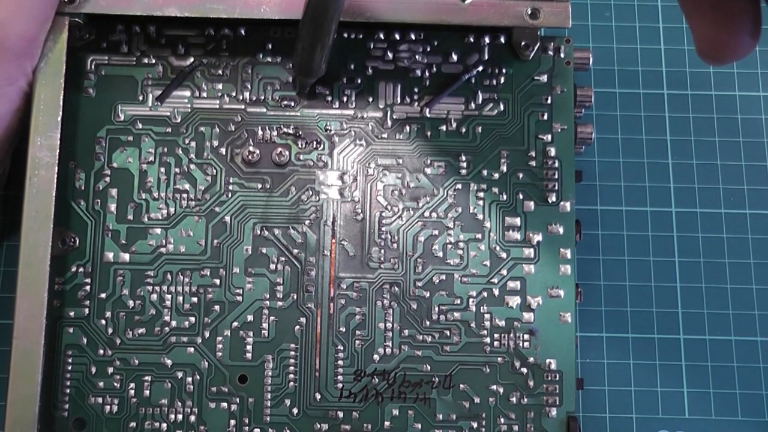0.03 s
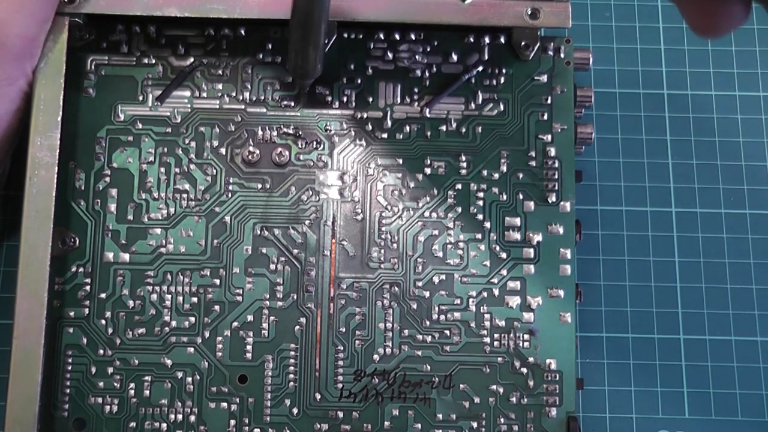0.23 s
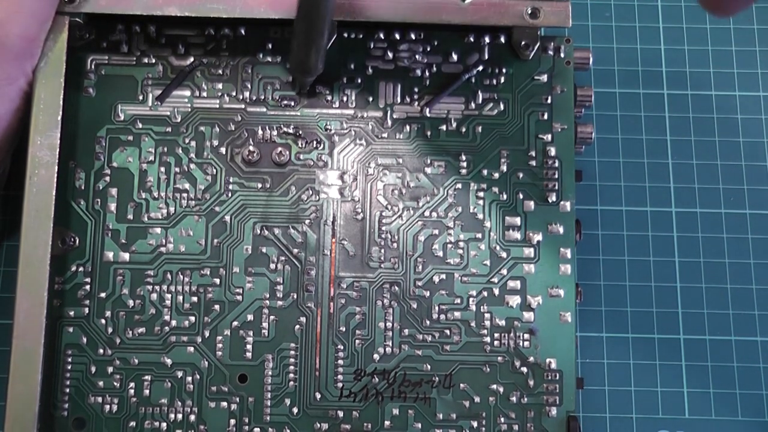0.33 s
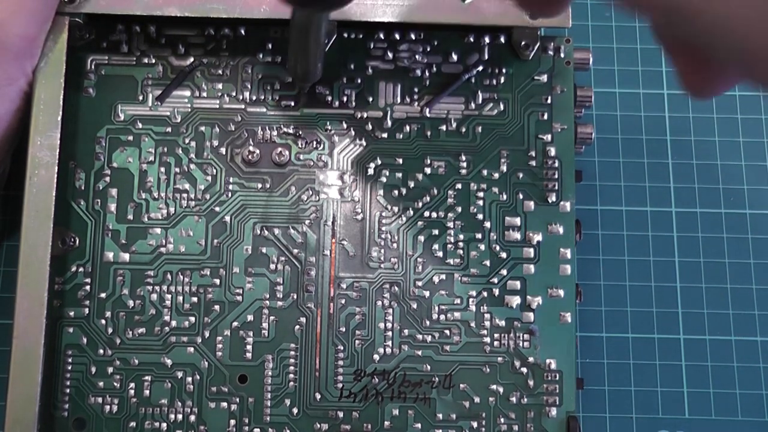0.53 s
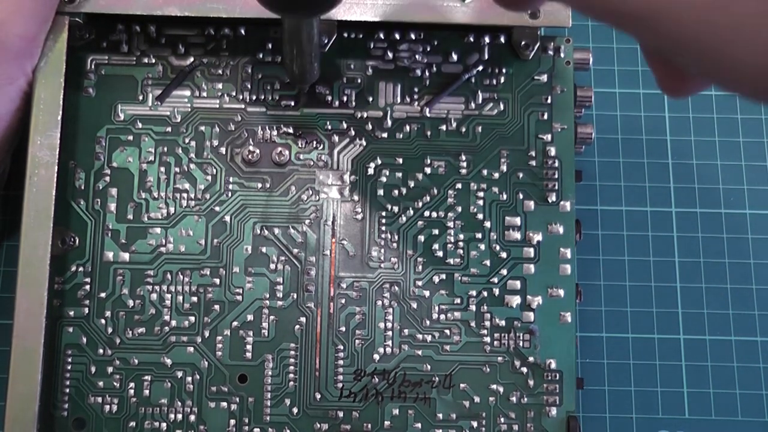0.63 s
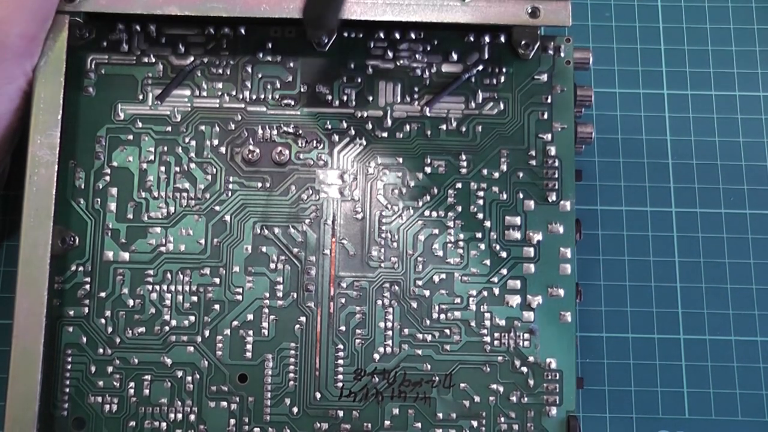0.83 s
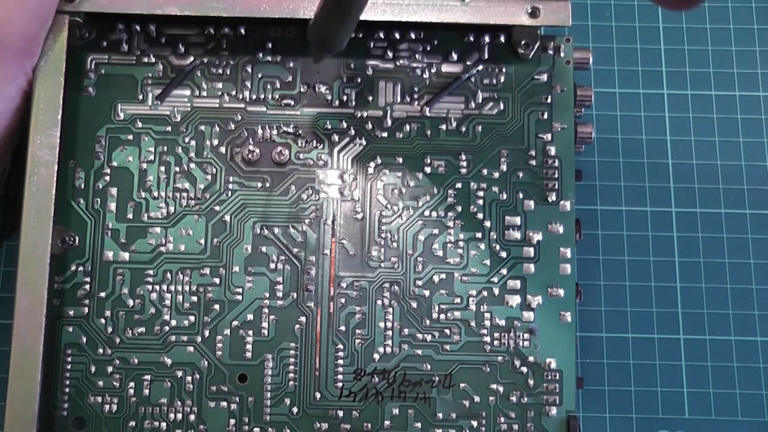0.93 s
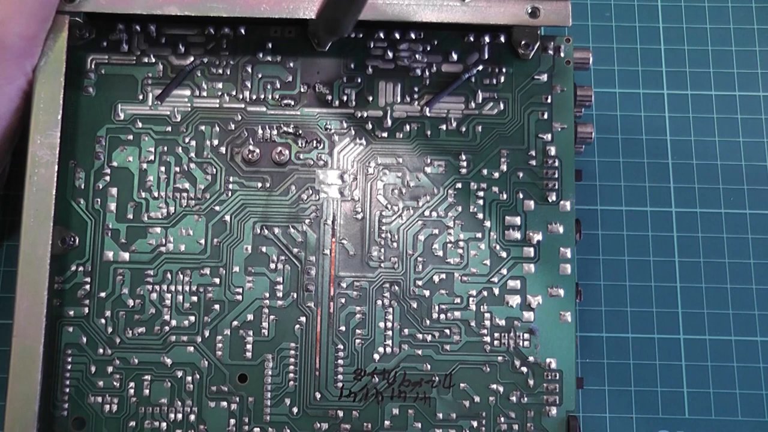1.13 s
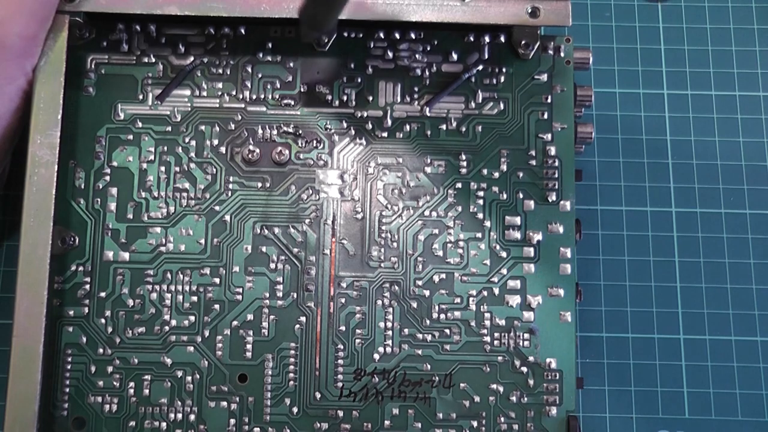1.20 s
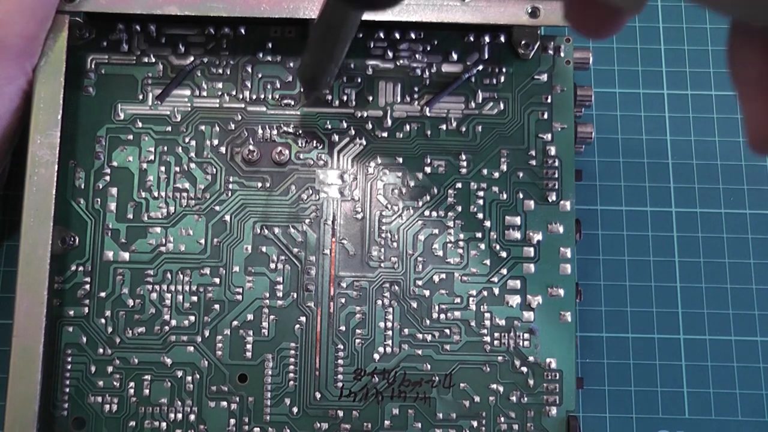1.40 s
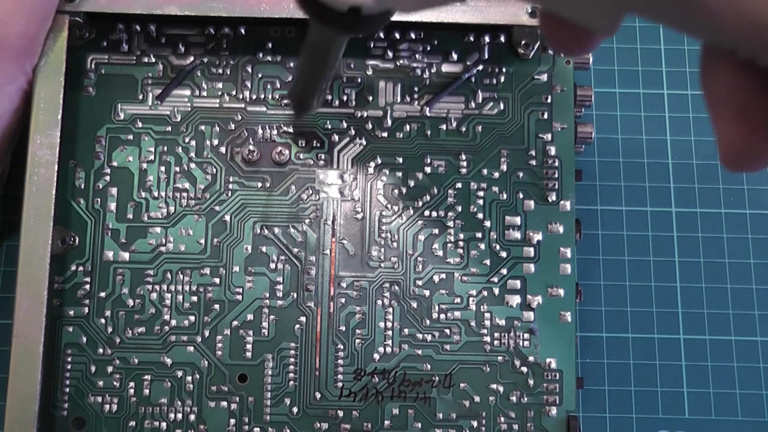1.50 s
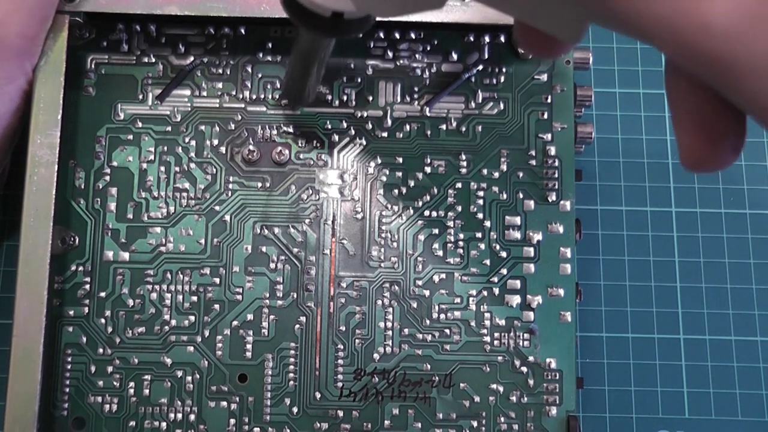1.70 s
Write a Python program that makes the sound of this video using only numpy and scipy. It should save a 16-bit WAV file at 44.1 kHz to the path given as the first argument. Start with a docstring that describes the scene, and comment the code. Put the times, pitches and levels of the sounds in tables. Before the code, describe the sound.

Desoldering gun buzzing and hissing in one longer and two short bursts, its trigger clicking.

```python
"""Desoldering gun on a circuit board

A desoldering gun is triggered three times at a workbench. Its switch clicks, and its diaphragm pump
spins up, buzzes, rattles, sucks air and coasts to rest. In the first burst the nozzle seals on a joint,
so the pump runs faster and cleaner. Solder spits, and the nozzle scrapes and knocks on the board.
A faint hum fills the room."""
import sys
import numpy as np
from scipy import signal
from scipy.fft import rfft, irfft
from scipy.io import wavfile

SR = 44100
rng = np.random.default_rng(int(sys.argv[2]) if len(sys.argv) > 2 else 0)


def store_pcm(level_fs):
    """Save levels as 16-bit WAV."""
    pcm = np.round(np.clip(level_fs, -1, 1) * 32767).astype(np.int16)
    wavfile.write(sys.argv[1], SR, np.atleast_2d(pcm).T)


N = 77175
T = np.arange(N) / SR

# how alike a noise is in both ears: (frequency [Hz], likeness [0-1])
EAR_LIKENESS = [(40, 0.5), (160, 0.99), (330, 0.77), (1000, 0.83), (2200, 0.89), (5000, 1), (9000, 0.99),
                (11000, 0.86), (14000, .45)]
# tone colour of the room noise: (frequency [Hz], relative level [dB])
ROOM_COLOUR = [(18, -79.5), (30, -38), (215, -24), (287, -3.5), (336, -8), (426, -16), (569, -28),
               (632, -22.5), (1220, -28), (1390, -21.5), (1500, -25.5), (2230, -30.5), (2410, -33),
               (4420, -36), (16000, -68)]
# tones of the hum: (frequency [Hz], level at the start [dB], level at the end [dB])
HUM_TONES = [(256.6, -62, -61.5), (280, -62.5, -54), (301.8, -54.5, -70.5), (335.3, -57.5, -53.5),
             (380, -82.5, -82), (411.7, -52.5, -67), (635, -80, -70), (1396, -70, -71.5), (1965, -74, -81)]
# path of a faint rising whine: (time [s], frequency [Hz], level [dB])
WHINE_PATH = [(1.5, 2130, -65), (1.6, 2160, -71), (1.75, 2215, -66.5)]

# solder spits in the nozzle: (time [s], level [dB])
SPIT_TIMES = [(0.3984, -23.5), (0.428, -31.5), (0.4575, -30), (.7148, -35), (0.7252, -24.5),
              (0.7605, -31.5), (0.934, -39)]
# the nozzle scrapes on the joint: (time [s], level [dB], length [s])
SCRAPE_TIMES = [(0.4, -40, 0.0026), (0.7174, -34, 0.018), (0.7642, -28.5, 0.0011)]
# resonances of the scraping nozzle: (frequency [Hz], width [Hz], relative level [dB])
NOZZLE_MODES = [(1430, 600, 1), (1980, 450, 3.5), (3300, 840, -3), (5300, 1500, -6)]
# the nozzle knocks on the board: (time [s], relative level [dB])
KNOCK_TIMES = [(0.7673, -31.5), (0.826, -30), (.9216, -19.5), (0.933, -38)]
# ringing of nozzle and board: (frequency [Hz], relative level [dB], time to fade by 60 dB [s])
BOARD_MODES = [(800, -44, .015), (1237, -9.5, .025), (2430, -49, .01), (3140, -9.5, 0.014),
               (3740, -5, 0.0051), (3890, 0, 0.0053), (4930, -43, 0.0099), (8650, -16, 0.0088),
               (10630, -11, 0.0049)]
# snaps of the trigger switch: (time [s], level [dB], length [s])
SWITCH_SNAPS = [(0.2022, -39, 0.0013), (0.2066, -25.5, 0.0011), (0.7388, -31, 0.0053),
                (0.9762, -32.5, 0.0011), (0.9798, -28.5, 0.0028), (1.1389, -28, 0.0021),
                (1.2657, -46, 0.0028), (1.2716, -29.5, 0.0031), (1.4052, -27.5, 0.0026)]
# resonances of the switch: (frequency [Hz], width [Hz], relative level [dB])
SWITCH_MODES = [(1490, 560, -1), (3590, 800, 0.5), (5360, 540, -2.5), (7360, 940, -2), (10070, 770, 0.5),
                (11840, 890, -2.5), (14550, 1400, -2.5)]
# resonances of the venting air: (frequency [Hz], width [Hz], relative level [dB])
VENT_MODES = [(1440, 230, -3), (4040, 3400, -4), (10050, 700, -6), (10440, 450, 0.5), (13100, 620, -5)]

# runs of the pump: (switched on [s], switched off [s], at rest [s], extra hiss [dB])
PUMP_BURSTS = [(.211, .742, .905, 1), (.984, 1.141, 1.275, 1.5), (1.279, 1.407, 1.54, 1)]
# buzz with the nozzle open: (multiple of the stroke rate [-], relative level [dB])
OPEN_HARMONICS = [(1, -21), (2, 2.5), (3, -5), (4, -5), (5, -14), (6, -7), (7, -37), (8, -20.5), (9, -33),
                  (10, -22), (11, -32), (12, -29), (13, -8), (14, -13), (15, -24), (16, -24), (17, -30.5),
                  (18, -19), (19, -25), (20, -30), (21, -23), (22, -40), (23, -11), (24, -30), (25, -35),
                  (26, -22), (27, -21), (28, -21), (29, -23)]
# buzz with the nozzle sealed: (multiple of the stroke rate [-], relative level [dB])
SEALED_HARMONICS = [(1, -23), (2, 1.5), (3, -0.5), (4, -7.5), (5, -20.5), (6, -23.5), (7, -16), (8, -36.5),
                    (9, -11), (10, -19), (11, -8), (12, -14.5), (13, -41), (14, -30), (15, -52), (16, -17),
                    (17, -33), (18, -26.5), (19, -20), (20, -34), (21, -22.5), (22, -36), (23, -18),
                    (24, -37), (25, -18.5), (26, -15), (27, -36), (28, -17), (29, -20.5), (30, -33),
                    (31, -20)]
# resonances of the gun's housing: (frequency [Hz], width [Hz], relative level [dB])
HOUSING_MODES = [(270, 52, 1), (424, 59, -9.5), (751, 19, -3.5), (995.5, 33, 2.5), (1430, 90, -11.5),
                 (1850, 120, -3.5), (2102, 41, 1.5), (2370, 56, -7.5), (3010, 250, -8), (4040, 190, -10.5)]
# tone colour of the air in the pump: (frequency [Hz], relative level [dB])
AIR_COLOUR = [(30, -12), (110, 9), (400, 10.5), (650, 2), (1400, -4), (2800, -3.5), (4200, 0), (6200, -4.5),
              (7800, -2.5), (8900, 4.5), (10000, -3.5), (12000, -5.5), (15500, -8.5), (17000, -16)]

OPEN_HZ, SEAL_RISE_HZ = 76.62, 8.8   # strokes a second with the nozzle open; what a full seal adds
SEAL_AT_S, SEAL_BUILD_S = .342, .1   # when the vacuum starts and how quickly it builds


def from_db(db):
    """Turn decibels into a gain."""
    return 10 ** (np.asarray(db) / 20)


def rms_one(x):
    """Scale a signal to an average (rms) level of 1."""
    return x / np.sqrt(np.mean(x ** 2) + 1e-20)


def pan(db):
    """Left and right gains; positive decibels favour the left."""
    return from_db(np.array([[db], [-db]]) / 2)


def at_hz(points, hz):
    """Read a curve between its points on a logarithmic frequency scale."""
    frequencies, values = np.transpose(points)
    return np.interp(np.log(hz + 1), np.log(frequencies), values)


def drift(rate_hz):
    """A random wobble of size 1, mostly slower than the given rate."""
    hz = np.fft.rfftfreq(N, 1 / SR)
    return rms_one(irfft(rfft(rng.standard_normal(N)) / (1 + (hz / rate_hz) ** 2), N))


def stereo_noise(spectrum=None):
    """Noise of a given colour, mostly alike in both ears; rms 1."""
    hz = np.fft.rfftfreq(N, 1 / SR)
    mid, side = rfft(rng.standard_normal((2, N)))
    alike = np.clip(at_hz(EAR_LIKENESS, hz), 0, .999)
    colour = from_db(at_hz(spectrum, hz)) if spectrum else 1
    ears = np.sqrt(1 + alike) * mid + np.sqrt(1 - alike) * side * [[1], [-1]]
    return rms_one(irfft(colour * ears, N))


def resonate(x, modes):
    """Ring several resonances side by side; white noise keeps its level."""
    out, power = 0, 0
    for k, (hz, width, db) in enumerate(modes):
        r = np.exp(-np.pi * width / SR)
        gain = from_db(db) * np.sqrt((1 - r * r) / 2) * (-1) ** k
        feedback = [1, -2 * r * np.cos(2 * np.pi * hz / SR), r * r]
        out = out + signal.lfilter([gain, 0, -gain], feedback, x + 1e-18)
        power += from_db(db) ** 2
    return out / np.sqrt(power)


def pulse(start, hold_s, fade_s):
    """A loudness shape that starts suddenly, holds, then dies away."""
    return (T >= start) * np.exp(-np.maximum(T - start - hold_s, 0) / fade_s)


def room_echo(x, level_db=-13, t60_s=.1, cutoff_hz=10000):
    """The room adds a short, dull tail, different in each ear."""
    t = T[:SR // 3]
    tail = rng.standard_normal((2, len(t))) * from_db(-60 * t / t60_s) * (t > .002)
    tail = signal.sosfilt(signal.butter(1, cutoff_hz, fs=SR, output="sos"), tail)
    tail /= np.sqrt(np.sum(tail ** 2) / 2)
    return from_db(level_db) * signal.fftconvolve(x[None], tail, axes=1)[:, :N]


def background(noise_db=-50.5, sink_db_per_s=1.2):
    """A wavering hum, a faint whine near the end and slowly sinking room noise."""
    hum = 0
    for hz, first_db, last_db in HUM_TONES:
        waver = 1 + .38 * (drift(3.5) + 1j * drift(1.3))   # in both level and phase
        ear_spread = .046 * (drift(5) + 1j * drift(5.5)) * np.array([[1], [-1]])
        tone = np.exp(2j * np.pi * (hz * T + rng.random()))
        hum = hum + from_db(np.linspace(first_db, last_db, N)) * np.real((waver + ear_spread) * tone)
    times, hz, db = np.transpose(WHINE_PATH)
    cycles = np.cumsum(np.interp(T, times, hz)) / SR
    whine = (T > times[0]) * from_db(np.interp(T, times, db)) * np.sin(2 * np.pi * cycles)
    noise = from_db(noise_db - sink_db_per_s * T) * stereo_noise(ROOM_COLOUR)
    return np.sqrt(2) * (hum + whine) + noise


def spits(centre_hz=9400, width_hz=18000):
    """Bright ticks of solder being sucked up."""
    envelope = sum(from_db(db) * pulse(start, 0, fade_s=.00071) for start, db in SPIT_TIMES)
    return resonate(envelope * stereo_noise(), [(centre_hz, width_hz, 0)])


def scrapes(grain_db=8, grain_hz=900):
    """Short gritty rubs of the nozzle as it works the joint loose."""
    envelope = sum(from_db(db) * pulse(start, hold, fade_s=.0048) for start, db, hold in SCRAPE_TIMES)
    grit = rms_one(from_db(grain_db * drift(grain_hz)) * stereo_noise())
    return resonate(envelope * grit, NOZZLE_MODES)


def knocks(bounce_s=.00105, bounce_db=-10, crack_db=-12, band_hz=(650, 10200)):
    """The nozzle hits the board with a short crack, bounces once and sets it ringing."""
    t = T[:SR // 10]
    ring = sum(from_db(db - 60 * t / t60) * np.sin(2 * np.pi * hz * t) for hz, db, t60 in BOARD_MODES)
    out = np.zeros(N)
    for start, db in KNOCK_TIMES:
        for hit_s, hit_db in ((start, db), (start + bounce_s, db + bounce_db)):
            i = int(hit_s * SR)
            out[i:i + len(t)] += from_db(hit_db) * ring
        crack = resonate(rng.standard_normal(N), [(3900, 1600, 0)])
        out += from_db(db + crack_db) * pulse(start, 0, fade_s=.0051) * crack
    out = signal.sosfilt(signal.butter(2, band_hz, "band", fs=SR, output="sos"), out)
    return out + room_echo(out)


def trigger():
    """The switch chatters for a few milliseconds as it snaps over, a little to the right."""
    envelope = sum(from_db(db) * pulse(start, hold, fade_s=.0012) for start, db, hold in SWITCH_SNAPS)
    snap = resonate(envelope * stereo_noise(), SWITCH_MODES)
    return pan(db=-2.1) * snap + room_echo(snap.mean(axis=0))


def vent(level_db=-53.5):
    """Air rushes back in with a thin hiss as the first burst's vacuum leaks away."""
    switched_off = PUMP_BURSTS[0][1]
    envelope = pulse(switched_off, hold_s=.14, fade_s=.0088)
    return from_db(level_db) * resonate(envelope * stereo_noise(), VENT_MODES)


def motor(spin_up_s=.028, coast_bend=1.8, load_s=.11, unload_s=.021):
    """The motor spins up and coasts down; gives its speed (0-1), load (0-1) and gain of the hiss."""
    speed, load, air = np.zeros((3, N))
    for on, off, rest, air_db in PUMP_BURSTS:
        powered_s = np.clip(T - on, 0, off - on)
        coasting_s = np.maximum(T - off, 0)
        run_down = 1 - np.minimum(coasting_s / (rest - off), 1) ** coast_bend
        spin = (1 - np.exp(-powered_s / spin_up_s)) * run_down
        speed += spin
        load += spin * (1 - np.exp(-powered_s / load_s)) * np.exp(-coasting_s / unload_s)
        air += from_db(air_db) * spin ** 1.96
    return speed, load, air


def hiss(strokes, seal, load, air, base_db=-43.5, sealed_db=-2.5):
    """Air puffs through the pump on each stroke; a seal makes it quieter but more pulsing."""
    depth = .14 + .31 * seal * load
    puffs = 1 + depth * np.cos(2 * np.pi * strokes)
    return air * from_db(base_db + sealed_db * seal) * puffs * stereo_noise(AIR_COLOUR)


def rattle(strokes, seal, speed, base_db=-39.5, sealed_db=-6, coast_db=-11.5):
    """The pump shakes its housing twice a stroke, less when sealed or coasting."""
    powered = sum(pulse(on, off - on, fade_s=.043) for on, off, _, _ in PUMP_BURSTS)
    level = speed ** 1.33 * from_db(base_db + sealed_db * seal + coast_db * (1 - powered))
    shakes = 1 + .59 * np.cos(4 * np.pi * strokes)
    return resonate(level * shakes * stereo_noise(), HOUSING_MODES)


def buzz(strokes, seal, load, open_db=-35.5, sealed_db=-32):
    """The diaphragm buzzes at multiples of its stroke rate, louder and steadier as the nozzle seals."""
    out, open_levels = 0, dict(OPEN_HARMONICS)
    roughness = .2 * (1 - seal) + .023 * seal
    for k, db in SEALED_HARMONICS:
        open_gain = from_db(open_db + open_levels.get(k, -np.inf))
        level = (1 - seal) * open_gain + seal * from_db(sealed_db + db)
        smear = .0537 * (k - 1) * rng.standard_normal()   # high harmonics line up less with the stroke
        flutter = 1 + roughness * drift(35)
        out = out + level * flutter * np.sin(2 * np.pi * (k * strokes + smear))
    return load * out


def pump():
    """Buzz, rattle and hiss all follow the pump's strokes, which quicken as the vacuum builds."""
    speed, load, air = motor()
    first_rest = PUMP_BURSTS[0][2]
    seal = (1 - np.exp(-np.maximum(T - SEAL_AT_S, 0) / SEAL_BUILD_S)) * (T < first_rest)
    jitter = 1 + .0019 * drift(14.7)
    strokes = np.cumsum(speed * (OPEN_HZ + SEAL_RISE_HZ * seal) * jitter) / SR
    tone = buzz(strokes, seal, load)
    noise = rattle(strokes, seal, speed) + hiss(strokes, seal, load, air)
    return tone + pan(db=1.3) * noise


def scene():
    """The gun, the board and the room together, in stereo."""
    return pump() + vent() + trigger() + knocks() + scrapes() + spits() + background()


def record(dry, cutoff_hz=15900):
    """Cut off the highest treble steeply."""
    return signal.sosfilt(signal.ellip(10, .1, 80, cutoff_hz, fs=SR, output="sos"), dry)


dry = scene()
out = record(dry)
store_pcm(out)
```